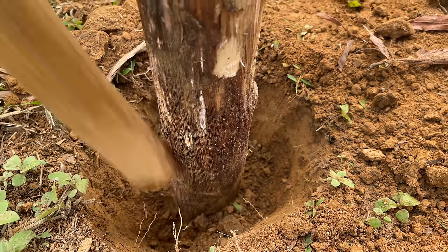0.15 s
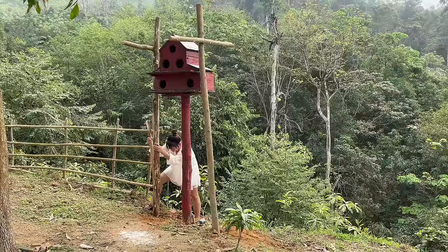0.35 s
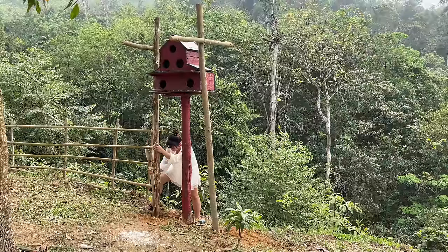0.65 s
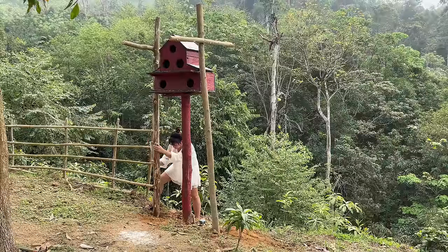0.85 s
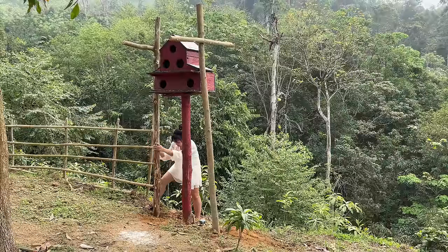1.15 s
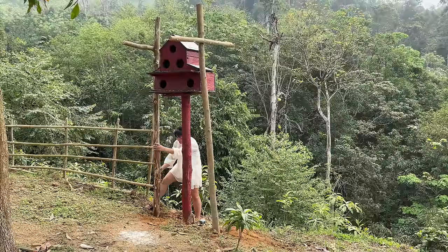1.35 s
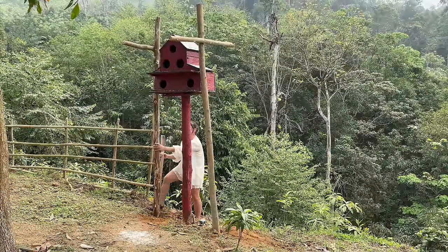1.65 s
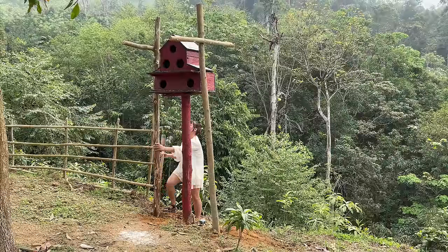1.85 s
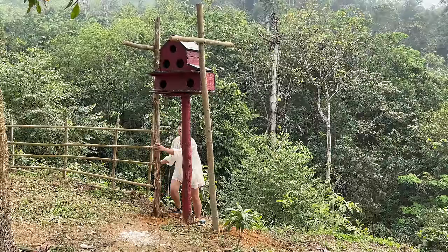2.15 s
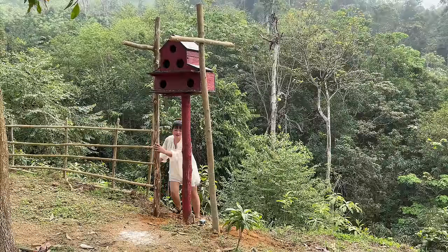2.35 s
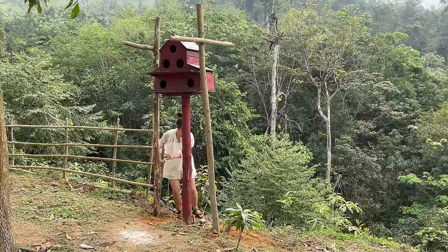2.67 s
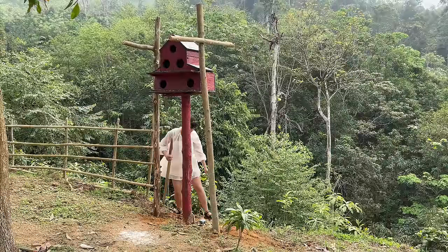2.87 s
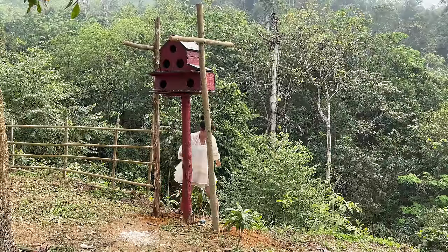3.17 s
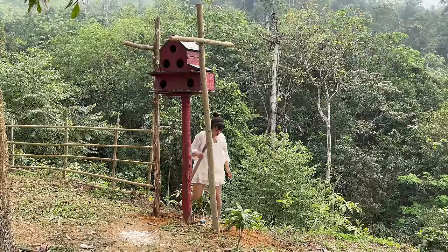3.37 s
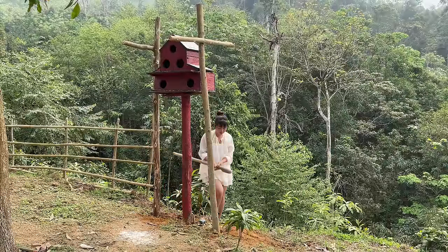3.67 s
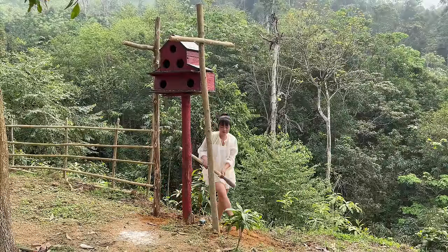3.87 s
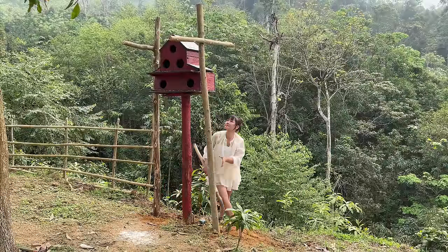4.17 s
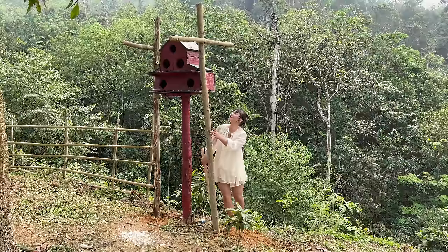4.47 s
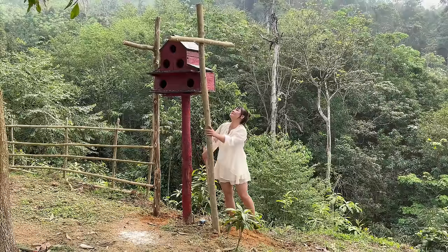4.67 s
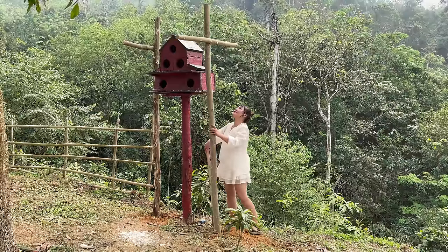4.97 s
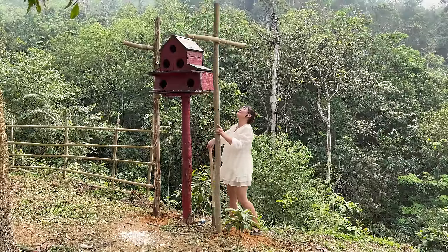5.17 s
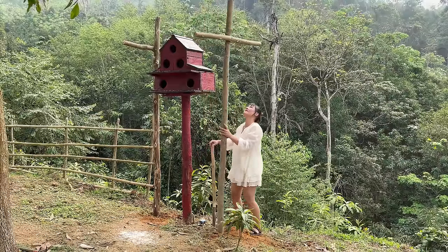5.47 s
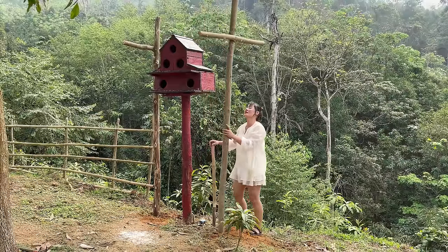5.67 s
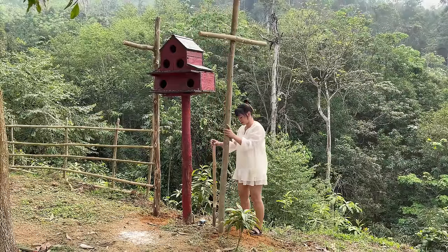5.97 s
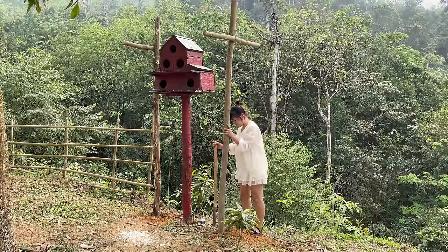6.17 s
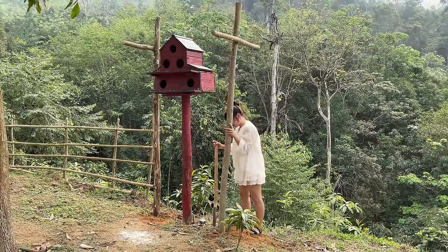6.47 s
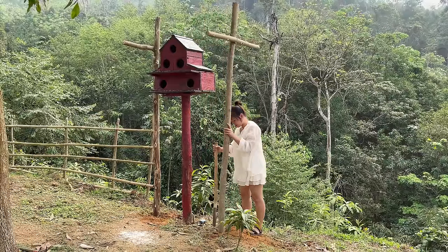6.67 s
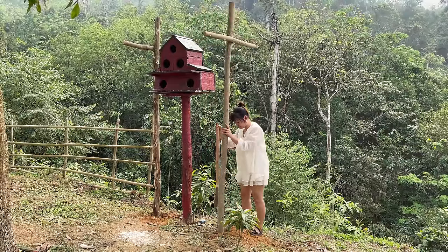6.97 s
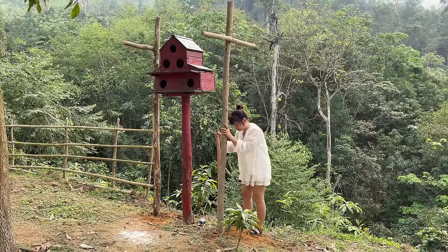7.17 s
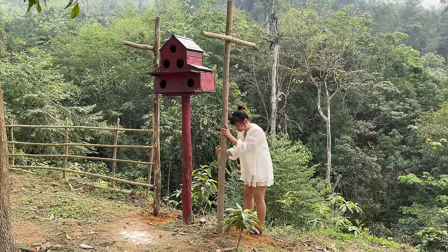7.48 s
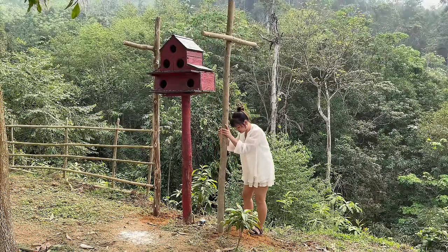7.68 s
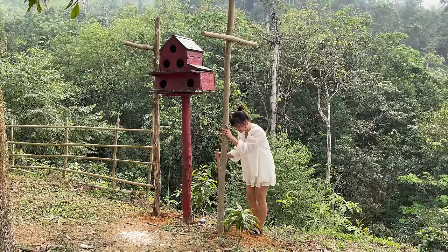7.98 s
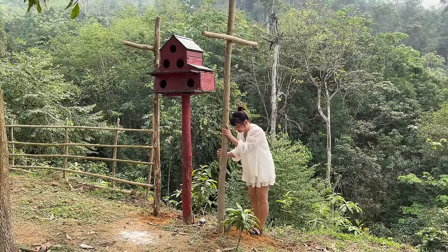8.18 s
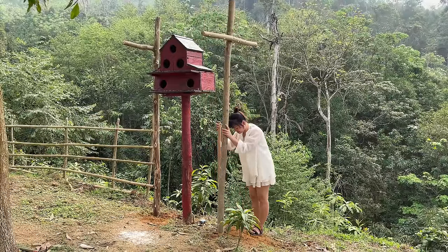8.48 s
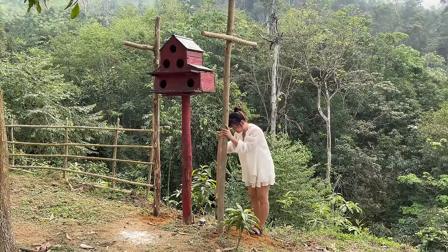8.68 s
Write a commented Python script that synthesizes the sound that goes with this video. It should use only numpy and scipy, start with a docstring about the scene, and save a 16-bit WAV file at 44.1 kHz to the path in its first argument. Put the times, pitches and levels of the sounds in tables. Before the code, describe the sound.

A wooden pole rams into loose soil with one loud gritty thud, then light wooden knocks, dull earth thumps and faint forest birdsong follow.

```python
"""A wooden pole is rammed into loose soil: gritty noise and short wood modes, then a deep sinking thud.
Lighter wooden knocks (noise cracks and modes), dull thumps (sinking sines) and brushed litter follow.
Birds whistle, call, buzz and trill (gliding sines), the far ones smeared by decaying noise echoes.
Behind: coloured-noise rumble, valley wash and leaf hiss, a low hum, a thin insect band and a faint whine."""
import sys
import numpy as np
from scipy import signal
from scipy.fft import rfft, irfft, next_fast_len
from scipy.io import wavfile
from scipy.ndimage import uniform_filter1d, map_coordinates

SR = 44100
rng = np.random.default_rng(int(sys.argv[2]) if len(sys.argv) > 2 else 0)


def int16_out(signal):
    """Quantize to a 16-bit WAV file."""
    q = np.round(np.clip(np.atleast_2d(signal).T, -1, 1) * 32767)
    wavfile.write(sys.argv[1], SR, q.astype(np.int16))


N = 389391
TIME = np.arange(N) / SR

# All source levels are ahead of stereo placement and the final mix.
# Background levels: t/s, valley level/dB, leaves level/dB
AIR_LEVELS = [(0, -63, -63.5), (2.6, -66, -65.5), (3.9, -61, -64.5), (4.8, -64.5, -66), (8.8, -65, -65)]
# Rumble spectrum: f/Hz, density/dB per Hz
RUMBLE_SPECTRUM = [(15, -31), (45, 1), (80, -0.5), (130, -12), (260, -33.5), (800, -80.5)]
# Valley wash spectrum: f/Hz, density/dB per Hz
VALLEY_SPECTRUM = [(40, -16.5), (120, -8), (185, -5.5), (260, -11.5), (500, -16.5), (1000, -26.5),
                   (1500, -23.5), (4000, -73)]
# Leaf hiss spectrum: f/Hz, density/dB per Hz
LEAF_SPECTRUM = [(1000, -31), (1700, -11), (2290, -11.5), (2760, -0.5), (3240, 1), (3970, -10),
                 (4810, -8.5), (7290, -14.5), (9010, -9.5), (10300, -27), (11100, -21.5), (14000, -47.5)]
# Left-right likeness of the forest's wash: f/Hz, correlation
WASH_LIKENESS = [(200, 0.98), (800, 0.17), (6500, 0.22), (9000, 0.27)]
# Spells of low rumble while the work goes on: start/s, end/s, level/dB
RUMBLE_SPELLS = [(0.478, 0.695, -44), (1.273, 1.63, -45), (2.385, 3.099, -46.5), (6.292, 6.532, -42.5),
                 (6.917, 7.232, -42.5), (7.355, 7.576, -37.5)]
# Pole scrapes in and lands: t/s, crack level/dB, t60/s, treble tilt/dB per octave, ring level/dB
RAM_CONTACTS = [(0.177, -28, 0.11, 5.5, -48), (0.1805, -13, 0.028, 0, -20), (0.1991, -11, 0.028, -1, -20),
                (.2055, -27.5, 0.076, .5, -29.5)]
# Grit spectrum: f/Hz, density/dB per Hz
GRIT_SPECTRUM = [(100, -7.5), (400, -2.5), (1400, -5), (2300, -8.5), (2800, -6), (4300, -16.5), (9000, -15),
                 (11500, -18), (14000, -36)]
# Pole modes: f/Hz, level/dB re ring
POLE_MODES = [(757, 0), (970, -5), (1490, -8), (2022, -9.5), (2732, -3.5), (2900, -4), (3430, -13.5)]
# Colour the hole gives the thud: f/Hz, gain/dB
PIT_COLOUR = [(220, -3), (310, -5), (410, -3), (540, 6), (720, 0.5)]
# Phase between the microphone ports for near sounds: f/Hz, left lead/rad
PORT_LEAD = [(60, -0.5), (1400, 1.74), (2800, 1.5), (4500, 2), (8500, 2), (12000, -8)]
# Shading between the ports: f/Hz, left over right/dB
PORT_SHADE = [(2500, 1.5), (5500, 8), (9000, 0.5)]
# Far bird's bouts of falling calls: start/s, calls, first gap/s
CALL_BOUTS = [(.256, 4, 0.17), (1.951, 5, 0.12), (3.557, 4, 0.13), (5.024, 5, 0.13), (6.726, 3, 0.12),
              (8.268, 4, 0.13)]
# Light knocks: t/s, crack level/dB, t60/s, treble tilt/dB per octave,
# stick ring level/dB, stick f/Hz, prop ring level/dB
KNOCK_EVENTS = [(0.6653, -31.5, 0.045, -0.66, -32.5, 1444, -44), (1.277, -39, 0.028, 0, -40, 1634, -43.5),
                (1.294, -38.5, 0.056, -2.5, -49.5, 1610, -47.5), (4.327, -52, 0.067, 0.5, -59, 1499, -52.5),
                (7.266, -44.5, 0.1375, 1.5, -58, 1780, -50.5), (7.8922, -40.5, 0.053, -.5, -53, 1620, -47),
                (8.774, -37, 0.092, 3, -68, 1848, -52)]
# Stick modes: multiple of stick f, level/dB re ring, t60/s
STICK_MODES = [(.44, -17, 0.05), (.92, 14.5, 0.02), (1.02, 7, 0.06)]
# Struck prop modes: f/Hz, level/dB re ring
PROP_MODES = [(740, -7), (2020, -2.5), (2560, -4.5), (2740, -3), (3100, -16), (3600, -4.5), (9700, -4)]
# Crack and litter spectrum: f/Hz, density/dB per Hz
CRACK_SPECTRUM = [(60, -1), (250, 4.5), (400, -6), (720, -1), (1020, -11.5), (1500, -4.5), (2300, -11.5),
                  (3000, -12), (4400, -15.5), (5800, -13), (8200, -17.5), (9600, -11.5), (12000, -16),
                  (13800, -42)]
# Dull thumps in the earth: t/s, peak level/dB, starting f/Hz
EARTH_THUMPS = [(0.887, -35.5, 126), (1.447, -29, 129.5), (2.199, -36.5, 172), (2.842, -26, 183),
                (3.072, -42.5, 220), (3.528, -40, 222), (6.284, -31.5, 160), (6.385, -32.5, 230),
                (6.505, -35, 122), (6.709, -29, 170), (7.371, -40, 323), (7.391, -30.5, 141),
                (7.438, -40.5, 271), (7.455, -30, 126), (7.496, -32.5, 225), (7.581, -31, 199),
                (8.023, -43.5, 262), (8.093, -48, 260), (8.244, -43, 160.6), (8.636, -41, 235)]
# Single chirps: t/s, level/dB, starting f/Hz, ending f/Hz, length/s
CHIRP_NOTES = [(1.076, -49.5, 5460, 6100, 0.021), (1.101, -45, 7220, 6380, 0.03),
               (2.147, -53.5, 3220, 2910, 0.0596), (5.254, -57, 4800, 5740, 0.049),
               (5.8, -45.5, 6750, 5430, 0.009), (6.896, -51, 3510, 2965, 0.038),
               (7.514, -60, 4800, 5330, 0.079)]
# High whistler's songs: start/s, series start/s, series gap/s, series notes, level/dB, top f/Hz
WHISTLE_SONGS = [(1.349, 1.744, .1465, 6, -48, 7900), (4.216, 4.685, .195, 5, -54.5, 8270)]
# Tops of the two opening notes: ratio to the song's top f
OPENING_RATIOS = (0.98, 1.05)
# Runs of sharp notes: start/s, notes, level/dB
SHARP_RUNS = [(1.707, 6, -54), (4.841, 9, -48.5)]
# Buzzes ending in a slur: slur t/s, slur level/dB
BUZZ_EVENTS = [(1.552, -59.5), (2.235, -58.5), (4.787, -55.5), (5.477, -54)]
# Shoes and clothes brush through dry litter: t/s, length/s, level/dB, treble tilt/dB per octave
LITTER_SCUFFS = [(1.627, 0.22, -62, 0.5), (3.062, 0.1, -55, -3), (3.223, 0.091, -52, -3.5),
                 (3.68, 0.29, -56, -3), (3.859, 0.16, -57.5, -1)]
# Trills: start/s, end/s, pip level/dB, f/Hz
TRILL_EVENTS = [(6.421, 6.87, -65.5, 4340), (6.886, 7.412, -61.5, 4530), (8.308, 8.606, -65, 4284)]
# Forest echo decay: f/Hz, t60/s
FOREST_DECAY = [(200, .2), (1500, 0.53), (5000, 0.57), (8000, 0.59), (14000, 1)]

CALM_DB = -54.5  # rumble between spells
SPELL_ATTACK_S, SPELL_RELEASE_S = 0.039, 0.13
LULL_S, LULL_WIDTH_S, LULL_DB = 5.04, 0.89, -9.5  # middle, Gaussian width, change at middle
WASH_LEAD_S = .00047  # left port first
HUM_HZ, HUM_DB = 150.8, -64.5
POLE_T60_S, PROP_T60_S = .045, 0.076  # damp wood rings only briefly
CALL_DB, CALL_FROM_HZ, CALL_TO_HZ, CALL_S = -62.5, 2950, 1890, .052  # before random spread
CALL_TURN = .72  # share of a call's length at which it bottoms out
CALL_LIMIT_GAP_S, GAP_RATIO = .197, .5  # pace approached; share of the gap's shortfall left per call
SCATTER_SHARE, SCATTER_T60_S = .6, .11  # power share blurred by foliage
JOLT_DB, JOLT_HZ = -8.5, 328  # ground jolt re its knock's crack; starting pitch
BUMPS_PER_S, BUMP_HZ = 5, 262  # median starting pitch
BUMP_DB, BUMP_SPREAD_DB = -4.5, 4  # re capped rumble level
BUMP_RUMBLE_MAX_DB = -48.5  # cap on the rumble level that bumps follow
OPENING_GAP_S, OPENING_DB = .262, 1  # level re series
OPENING_SCOOP, SERIES_SCOOP = .92, .69  # starting pitch over top
WHISTLE_S, WHISTLE_SETTLE = .065, 8
BUZZ_S, PIPS_PER_S, BUZZ_HZ, BUZZ_DB = .19, 55, 4030, -3  # level re slur
SLUR_FROM_HZ, SLUR_TO_HZ, SLUR_S = 3900, 2820, .064
RUN_GAP_S, RUN_SAG_HZ_PER_S = .0524, 900
TRILL_GROUP_S, TRILL_NOTE_S = .046, .013  # group to group, note to note
LOW_CUT_HZ, HIGH_CUT_HZ = 27.8, 16200


def amp(db):
    """Decibels to gain."""
    return 10 ** (np.asarray(db) / 20)


def unit(x):
    """Scale to rms 1."""
    return x / np.sqrt(np.mean(x ** 2) + 1e-20)


def along(points, hz):
    """Interpolate (Hz, value) points on a log frequency axis."""
    f, v = np.transpose(points)
    return np.interp(np.log(hz + 1), np.log(f + 1), v)


def curves(rows):
    """One value per sample for each column after the time."""
    s, *cols = np.transpose(rows)
    return [np.interp(TIME, s, c) for c in cols]


def wobble(rate, size=N):
    """Smooth random curve, rate knots a second."""
    knots = rng.standard_normal(int(size * rate / SR) + 4)
    return map_coordinates(knots, [np.arange(size) * rate / SR])


def filtered(x, response):
    """Apply a frequency response by FFT."""
    size = x.shape[-1]
    m = next_fast_len(size + 4096)
    return irfft(rfft(x, m) * response(np.fft.rfftfreq(m, 1 / SR)), m)[..., :size]


def noise(spectrum, alike, tilt_db=0, size=N):
    """Coloured stereo noise of rms 1; alike is the left-right correlation."""
    def colour(hz):
        return amp(along(spectrum, hz) + tilt_db * np.log2(hz + 1))
    mid, side = filtered(rng.standard_normal((2, size)), colour)
    turn = np.arccos(np.clip(alike, -1, 1)) / 2
    return unit(np.cos(turn) * mid + np.sin(turn) * np.array([side, -side]))


def add(track, s, sound):
    """Mix a sound into a track at time s."""
    start = max(round(s * SR), 0)
    part = track[..., start:start + sound.shape[-1]]
    part += sound[..., :part.shape[-1]]


def placed(x, left_db):
    """Pan by level; left_db is left over right."""
    return amp(left_db * np.array([[.5], [-.5]])) * x


def ports(x):
    """The microphone body shades near sounds and shifts their phase between its two ports."""
    side = np.array([[.5], [-.5]])

    def response(hz):
        shade = amp(side * along(PORT_SHADE, hz))
        return shade * np.exp(1j * side * along(PORT_LEAD, hz))
    return filtered(x, response)


def glide(start_hz, end_hz, length, settle):
    """Sine easing exponentially between two pitches, and its progress 0-1."""
    u = np.linspace(0, 1, max(int(length * SR), 8))
    ease = (np.exp(-settle * u) - np.exp(-settle)) / (1 - np.exp(-settle))
    hz = end_hz + (start_hz - end_hz) * ease
    return np.sin(2 * np.pi * np.cumsum(hz) / SR), u


def ring(modes, t, scale=1):
    """Damped wood modes, at new strengths for every blow."""
    out = np.zeros(len(t))
    for hz, db, t60 in modes:
        decay = amp(db + rng.normal(0, 2.7) - 60 * t / t60)
        out += decay * np.sin(2 * np.pi * hz * scale * t)
    return out


def thud(start_hz, end_hz, length, settle, skew):
    """Soil gives way under a push: a few cycles sink in pitch and stop without ringing."""
    wave, u = glide(start_hz, end_hz, length, settle)
    return wave * np.sin(np.pi * u ** abs(skew))


def note(start_hz, end_hz, length, settle, flutter_db=2):
    """Bird note: a gliding whistle that swells, flutters and fades."""
    wave, u = glide(start_hz, end_hz, length, settle)
    swell = np.sqrt(np.abs(np.sin(np.pi * u)))
    return wave * swell * amp(flutter_db * wobble(180, size=len(u)))


def blurred(x):
    """Many short paths through foliage smear a song: convolution with decaying noise."""
    t = TIME[:SR // 8]
    paths = rng.standard_normal((2, len(t))) * amp(-60 * t / SCATTER_T60_S)
    smear = signal.fftconvolve(x[None], paths / np.linalg.norm(paths[0]), axes=1)[:, :N]
    return np.sqrt(1 - SCATTER_SHARE) * x + np.sqrt(SCATTER_SHARE) * smear


def forest(x):
    """Trunks and foliage scatter a diffuse echo with its own noise tail at each ear."""
    hz, _, bins = signal.stft(rng.standard_normal((2, SR // 2)), SR, nperseg=256)
    # istft returns times too: t here is the frame time from stft
    t = _
    decay = amp(-60 * t / along(FOREST_DECAY, hz)[:, None])
    tail = signal.istft(bins * decay, SR, nperseg=256)[1]
    return signal.fftconvolve(x, tail / np.linalg.norm(tail[0]), axes=1)[:, :N]


def rumble_level():
    """Rumble gain: a calm with one lull, and spells that rise, hold and fall."""
    gain = amp(CALM_DB + LULL_DB * np.exp(-((TIME - LULL_S) / LULL_WIDTH_S) ** 2))
    for start, end, db in RUMBLE_SPELLS:
        corners = [start - SPELL_ATTACK_S, start, end, end + SPELL_RELEASE_S]
        gate = np.interp(TIME, corners, [0, 1, 1, 0])
        gain = np.maximum(gain, amp(db) * gate)
    return gain


def wash(spectrum):
    """Forest noise, partly alike at the two ports, the left a little ahead."""
    def paired(hz):
        turn = np.arccos(np.clip(along(WASH_LIKENESS, hz), -1, 1)) / 2
        return np.array([np.cos(turn), np.sin(turn)])

    def lead(hz):
        side = np.array([[.5], [-.5]])
        return np.exp(1j * side * 2 * np.pi * hz * WASH_LEAD_S)
    mid, side = filtered(noise(spectrum, alike=0), paired)
    return unit(filtered(np.array([mid + side, mid - side]), lead))


def patchy(x, depth_db):
    """Narrow bands swell and fade independently of distant bands."""
    bins = signal.stft(x, nperseg=512)[2]
    field = uniform_filter1d(rng.standard_normal(bins.shape[1:]), size=4, axis=0)
    field = uniform_filter1d(field, size=16, axis=1)
    return unit(signal.istft(bins * amp(depth_db * unit(field)), nperseg=512)[1][:, :N])


def air():
    """Lumpy rumble close by, a soft valley wash and leaf hiss, all level-shaped noise."""
    valley_db, leaves_db = curves(AIR_LEVELS)
    rumble = rumble_level() * amp(3.0 * wobble(24)) * noise(RUMBLE_SPECTRUM, alike=0.44)
    valley = amp(valley_db + wobble(6.6)) * wash(VALLEY_SPECTRUM)
    leaves = amp(leaves_db) * patchy(wash(LEAF_SPECTRUM), depth_db=1.8)
    return placed(rumble, left_db=3.5) + placed(valley + leaves, left_db=2.0)


def drone(hz, rate):
    """Fuzzy stereo line: a tone with random complex strength, rate knots a second."""
    turn = np.exp(2j * np.pi * np.cumsum(hz * np.ones(N)) / SR)
    return unit(np.array([(turn * (wobble(rate) + 1j * wobble(rate))).real for _ in range(2)]))


def distance():
    """A wavering low hum, a thin insect band and a faint whine that sinks in pitch."""
    hum_hz = HUM_HZ + 2.5 * wobble(9.0)
    hum_tone = np.sqrt(2) * np.sin(2 * np.pi * np.cumsum(hum_hz) / SR)
    hum = amp(HUM_DB + wobble(6.1)) * hum_tone
    insects = amp(-75.5) * drone(hz=4590, rate=660)
    swell = np.exp(-((TIME - 5.2) / 2.2) ** 2)
    whine = amp(-80.0) * swell * drone(np.interp(TIME, [4, 7], [1560, 1290]), rate=14)
    return hum + insects + whine


def ram():
    """The pole grinds past the hole's wall, rings, squeezes loose soil and lands on the soft bottom."""
    out, t = np.zeros((2, N)), TIME[:SR // 8]
    modes = [(hz, level, POLE_T60_S) for hz, level in POLE_MODES]
    onset = 1 - np.exp(-t / 0.00022)
    for s, db, t60, tilt_db, ring_db in RAM_CONTACTS:
        grit = noise(GRIT_SPECTRUM, alike=0.97, tilt_db=tilt_db, size=len(t)) * amp(-60 * t / t60)
        add(out, s, (amp(db) * grit + amp(ring_db) * ring(modes, t)) * onset)
    soil = np.zeros(N)
    squeeze = thud(start_hz=450, end_hz=330, length=0.013, settle=1, skew=0.95)
    landing = thud(start_hz=638.0, end_hz=95.35, length=0.014, settle=3.635, skew=0.7)
    add(soil, .184, amp(-21) * squeeze)
    add(soil, .2005, amp(-1.5) * landing)
    out += placed(filtered(soil, lambda hz: amp(along(PIT_COLOUR, hz))), left_db=2.0)
    seated = amp(-60 * np.maximum(TIME - .212, 0) / 0.057)  # gripping soil mutes the pole
    return ports(out * seated)


def hooked_call():
    """A steep fall that rounds off and lifts as it fades, broken up by the way through the trees."""
    u = np.linspace(0, 1, int(CALL_S * SR * np.exp(.15 * rng.standard_normal())))
    hook = np.abs(1 - u / CALL_TURN) ** 2.4
    hz = CALL_TO_HZ + (CALL_FROM_HZ - CALL_TO_HZ) * hook
    hz *= 1 + .018 * rng.standard_normal()
    swell = np.sqrt(np.abs(np.sin(np.pi * np.sqrt(u)))) * (1 - .7 * u)
    return np.sin(2 * np.pi * np.cumsum(hz) / SR) * swell * amp(3 * wobble(300, size=len(u)))


def far_birds():
    """Slowing bouts of falling calls from deep in the forest, smeared by foliage."""
    out = np.zeros(N)
    for s, calls, first_gap in CALL_BOUTS:
        for k in range(round(calls)):
            add(out, s, amp(CALL_DB + rng.standard_normal()) * hooked_call())
            s += CALL_LIMIT_GAP_S + (first_gap - CALL_LIMIT_GAP_S) * GAP_RATIO ** k
    return placed(blurred(out), left_db=0.5)


def knocks():
    """Wood meets wood: a noise crack, damped stick and prop modes and a trickle of crumbs."""
    out, t = np.zeros((2, N)), TIME[:SR // 4]
    prop_modes = [(hz, level, PROP_T60_S) for hz, level in PROP_MODES]
    for s, db, t60, tilt_db, ring_db, ring_hz, prop_db in KNOCK_EVENTS:
        decay = amp(-60 * t / t60) + amp(-10 - 60 * t / 0.24)  # crack plus slower crumbs
        grains = amp(2.5 * wobble(575, size=len(t)))
        crack = noise(CRACK_SPECTRUM, alike=0.93, tilt_db=tilt_db, size=len(t))
        crack = amp(db) * crack * decay * grains
        stick = amp(ring_db) * ring(STICK_MODES, t, ring_hz)
        prop = amp(prop_db) * ring(prop_modes, t, 1 + 0.014 * rng.standard_normal())
        add(out, s, (crack + stick + prop) * (1 - np.exp(-t / 0.0011)))
    return ports(out)


def thumps():
    """Pushes into earth, jolts under knocks and chance bumps; those starting lower last longer."""
    out = np.zeros(N)
    level = np.minimum(rumble_level(), amp(BUMP_RUMBLE_MAX_DB))
    pushes = [(s, amp(db), hz) for s, db, hz in EARTH_THUMPS]
    pushes += [(s, amp(db + JOLT_DB), JOLT_HZ) for s, db, *_ in KNOCK_EVENTS]
    for k, (late, loud, sharp) in enumerate(rng.standard_normal((int(BUMPS_PER_S * N / SR), 3))):
        s = (k + late / 2) / BUMPS_PER_S
        gain = np.interp(s, TIME, level) * amp(BUMP_DB + BUMP_SPREAD_DB * loud)
        pushes.append((s, gain, BUMP_HZ * np.exp(0.19 * sharp)))
    for s, gain, start_hz in pushes:
        push = thud(start_hz, end_hz=49.2, length=0.02 + 3 / start_hz, settle=3.33, skew=0.59)
        add(out, s, gain * push)
    return placed(out, left_db=4.5)


def chirps():
    """Single gliding notes, fluttering and smeared by foliage."""
    out = np.zeros(N)
    for s, db, start_hz, end_hz, length in CHIRP_NOTES:
        add(out, s, amp(db) * note(start_hz, end_hz, length, settle=0.83, flutter_db=5.5))
    return blurred(out)


def whistle(start_hz, top_hz, length, settle, rasp):
    """Upward whistle: random pitch rasp is strongest on the way up, less at the top."""
    u = np.linspace(0, 1, int(length * SR))
    climb = np.exp(-settle * u)
    hz = top_hz + (start_hz - top_hz) * climb
    hz += top_hz * rasp * (climb + 0.32) * wobble(902, size=len(u))
    swell = np.sqrt(np.abs(np.sin(np.pi * u)))
    return np.sin(2 * np.pi * np.cumsum(hz) / SR) * swell * amp(2.36 * wobble(167, size=len(u)))


def whistler():
    """Songs of two shallow notes, the second higher, then a series of steep upward whistles."""
    out = np.zeros(N)
    for start, series_start, gap, notes, db, top_hz in WHISTLE_SONGS:
        song = [(start + k * OPENING_GAP_S, db + OPENING_DB, top_hz * ratio, OPENING_SCOOP)
                for k, ratio in enumerate(OPENING_RATIOS)]
        song += [(series_start + k * gap, db, top_hz, SERIES_SCOOP) for k in range(round(notes))]
        for s, level, hz, scoop in song:
            hz *= 1 + 0.005 * rng.standard_normal()
            sound = whistle(hz * scoop, hz, WHISTLE_S, WHISTLE_SETTLE, rasp=0.055)
            add(out, s, amp(level + rng.normal(0, 0.2)) * sound)
    return out


def sharp_runs():
    """Quick downward notes at an even pace, each a little lower than the last."""
    out = np.zeros(N)
    for start, notes, db in SHARP_RUNS:
        for t in RUN_GAP_S * np.arange(round(notes)):
            sag = RUN_SAG_HZ_PER_S * t
            sound = note(start_hz=5100 - sag, end_hz=3700 - sag, length=0.016, settle=0.14)
            add(out, start + t, amp(db) * sound)
    return out


def near_birds():
    """Chirps, high whistles and sharp runs from the edge of the trees."""
    return placed(whistler() + sharp_runs() + chirps(), left_db=3.0)


def pips(times, db, hz, length):
    """Tiny falling notes, uneven in time, pitch and strength."""
    out = np.zeros(N)
    for s in times:
        late, sharp, loud = rng.standard_normal(3)
        pitch = hz * (1 + 0.006 * sharp)
        pip = note(pitch * 1.045, pitch / 1.045, length, settle=0.16)
        add(out, s + 0.00097 * late, amp(db + 2 * loud) * pip)
    return out


def buzzer():
    """Quick pips swell around one pitch and tip over into a louder falling, smeared slur."""
    out, slurs = np.zeros(N), np.zeros(N)
    for s, db in BUZZ_EVENTS:
        swell = np.sqrt(np.clip((TIME - s) / BUZZ_S + 1, 0, 1))
        times = np.arange(s - BUZZ_S, s, 1 / PIPS_PER_S)
        out += swell * pips(times, db + BUZZ_DB, BUZZ_HZ, length=.012)
        slur = note(SLUR_FROM_HZ, SLUR_TO_HZ, SLUR_S, settle=0.69, flutter_db=5.0)
        add(slurs, s, amp(db) * slur)
    return out + blurred(slurs)


def scuffs():
    """Litter brushes: noise that swells and fades in clumps of tiny crackles."""
    out = np.zeros((2, N))
    for s, length, db, tilt_db in LITTER_SCUFFS:
        size = int(length * SR)
        clumps = unit(amp(2.7 * wobble(46, size=size) + 3.0 * wobble(450, size=size)))
        swell = np.sin(np.linspace(0, np.pi, size))
        add(out, s, amp(db) * swell * clumps * noise(CRACK_SPECTRUM, 0.077, tilt_db, size))
    return placed(out, left_db=3.5)


def triller():
    """Trills: chains of pips in quick pairs."""
    out = np.zeros(N)
    for start, end, db, hz in TRILL_EVENTS:
        groups = np.arange(start, end, TRILL_GROUP_S)
        times = [s + k * TRILL_NOTE_S for s in groups for k in range(2)]
        out += pips(times, db, hz, length=0.01)
    return out


def scene():
    """The ramming is dry; knocks and birds also feed the forest echo."""
    wood, near, far = knocks(), near_birds(), far_birds()
    trills = placed(triller() + buzzer(), left_db=4)
    echo = forest(amp(-7.5) * (near + trills) + far + amp(-23.0) * wood)
    work = ram() + wood + thumps() + scuffs()
    birds = amp(-9.0) * near + trills + far
    return work + birds + echo + distance() + air()


def record(dry):
    """Round off the highest peaks, roll off the lows and cut sharply at the top."""
    held = dry / (1 + np.abs(dry / .92) ** 8) ** (1 / 8)

    def band(hz):
        low_cut = hz ** 2 / np.sqrt(hz ** 4 + LOW_CUT_HZ ** 4)
        return low_cut * (hz < HIGH_CUT_HZ)
    return filtered(held, band)


dry = scene()
out = record(dry)
int16_out(out)
```